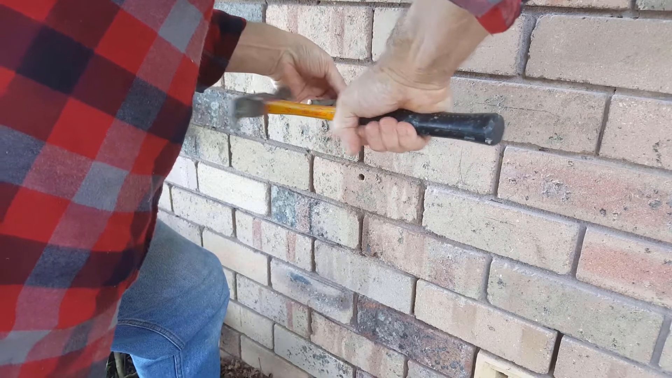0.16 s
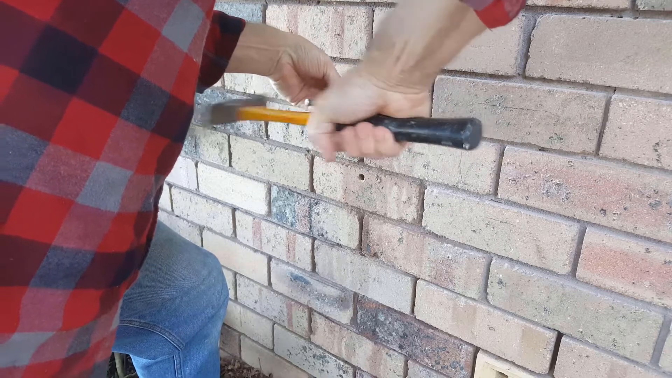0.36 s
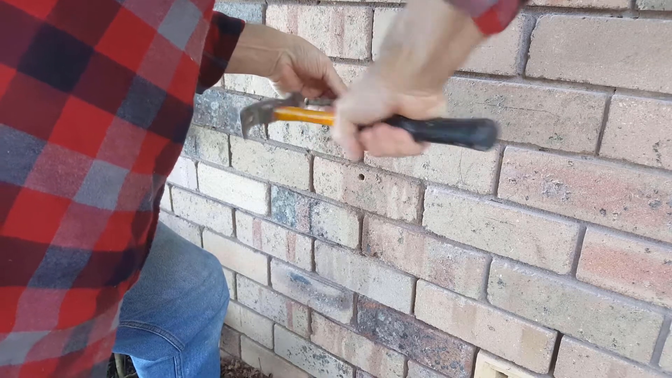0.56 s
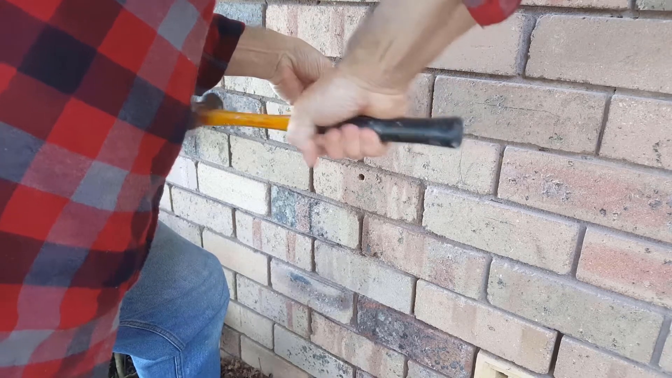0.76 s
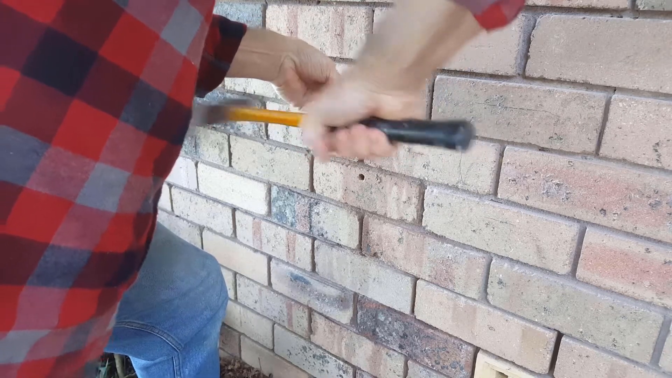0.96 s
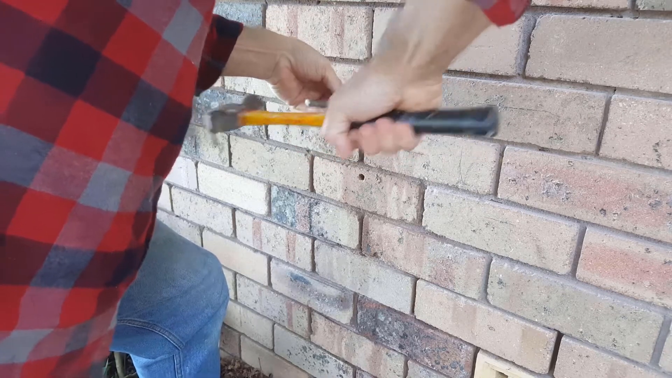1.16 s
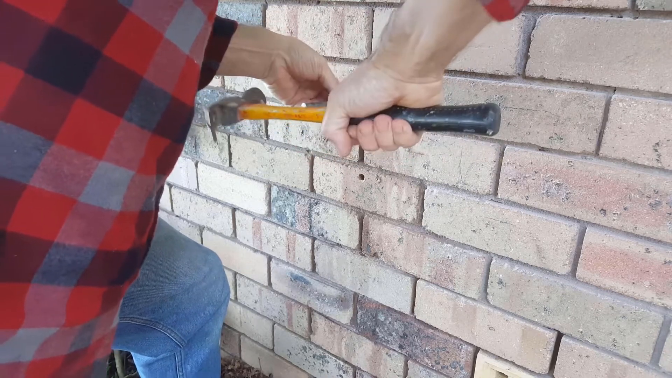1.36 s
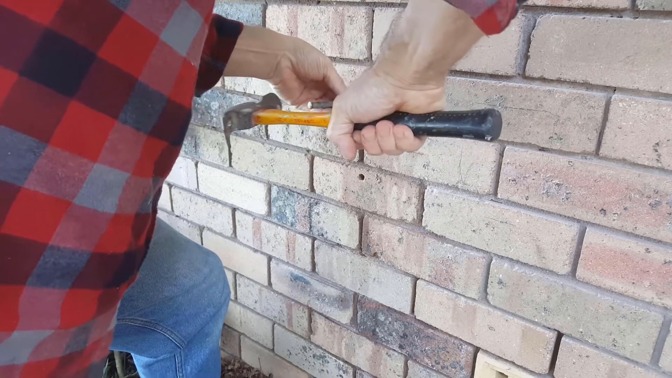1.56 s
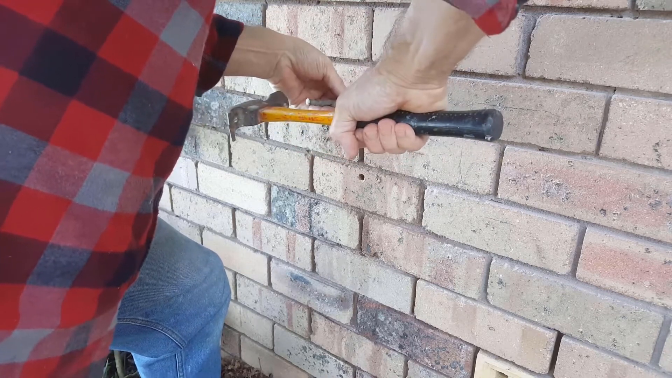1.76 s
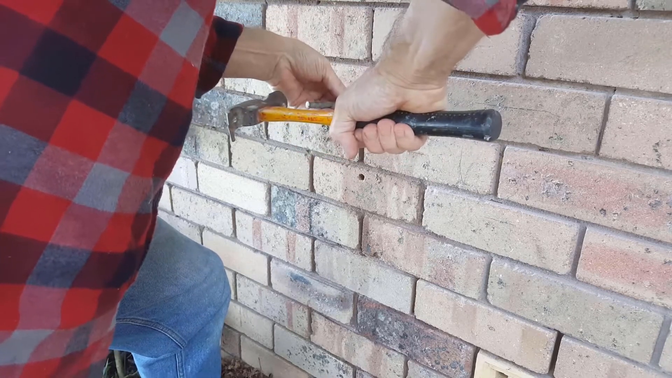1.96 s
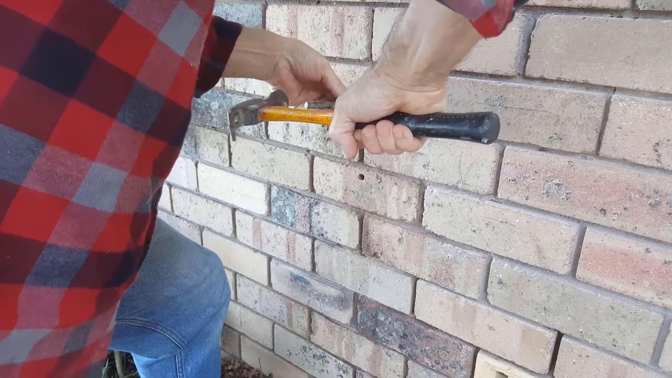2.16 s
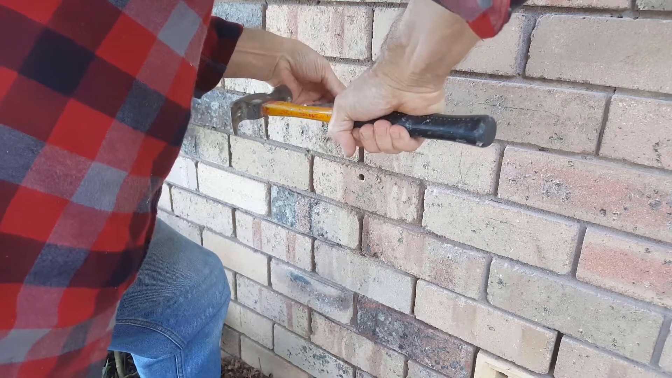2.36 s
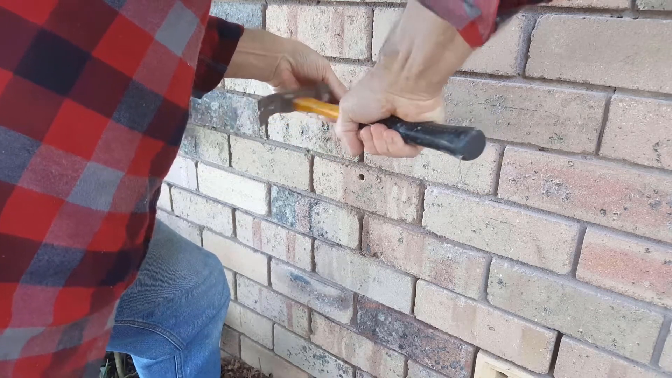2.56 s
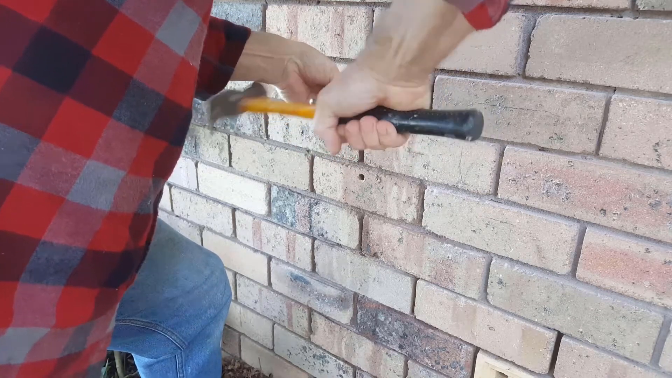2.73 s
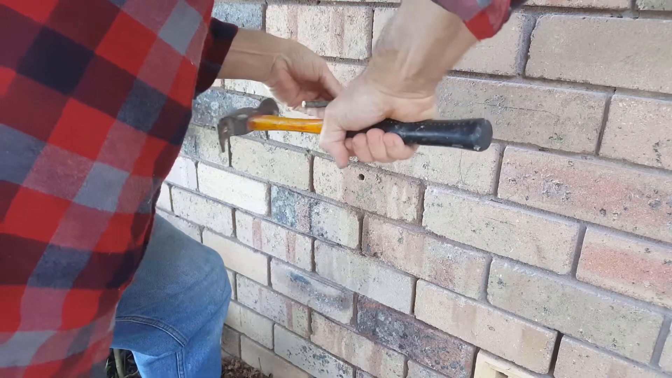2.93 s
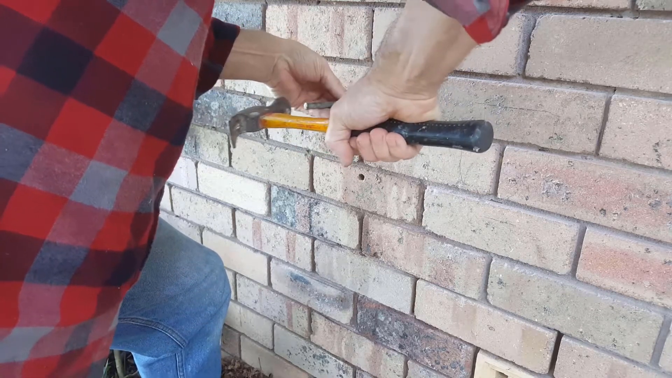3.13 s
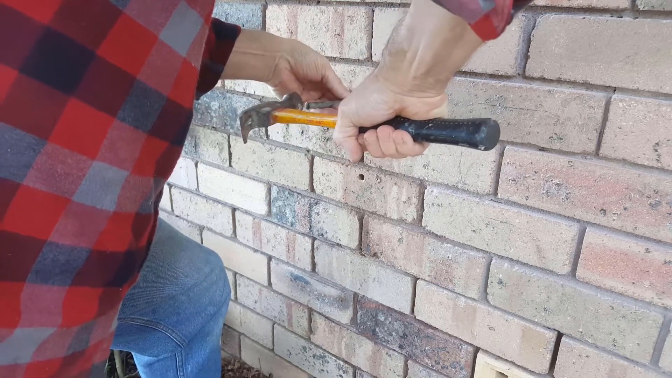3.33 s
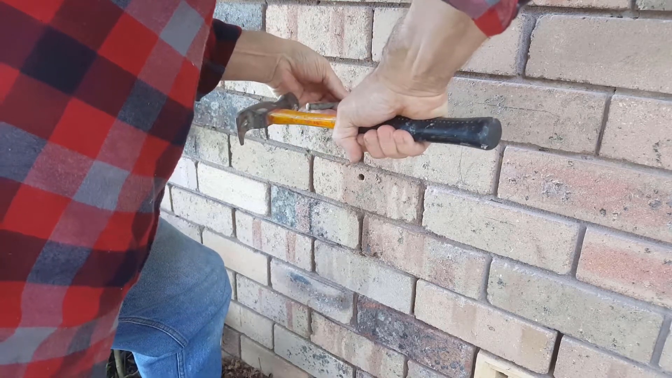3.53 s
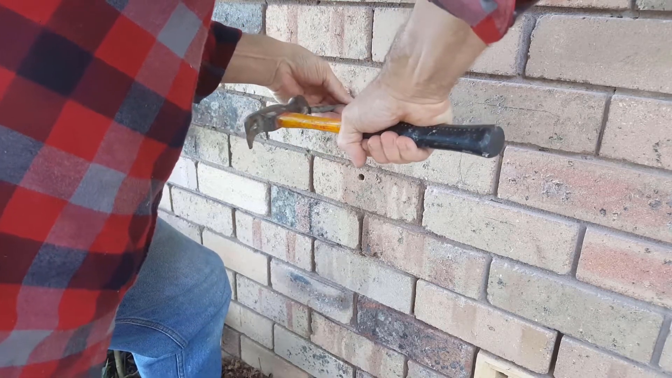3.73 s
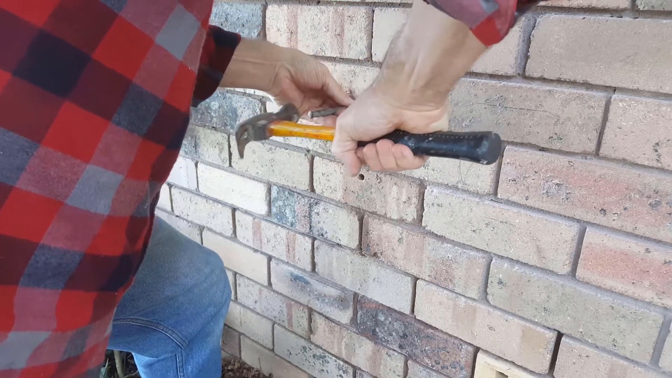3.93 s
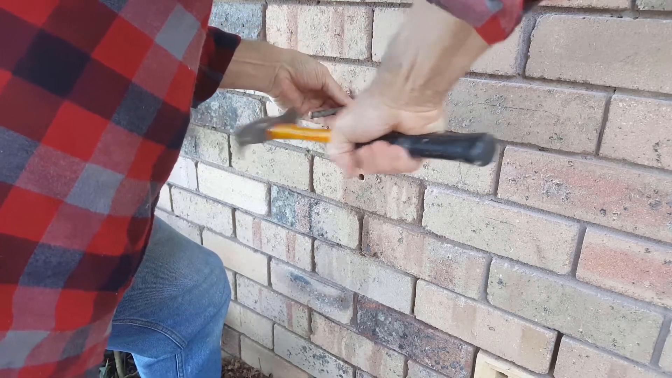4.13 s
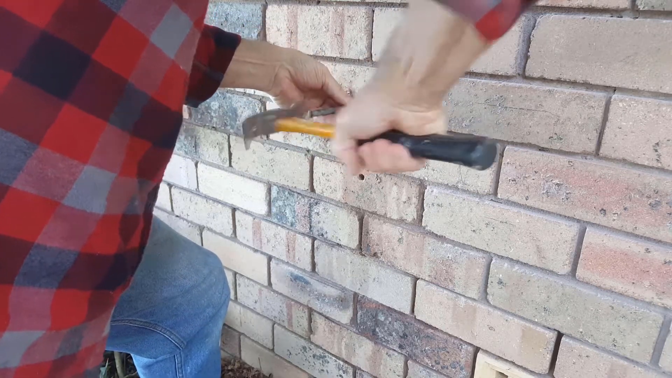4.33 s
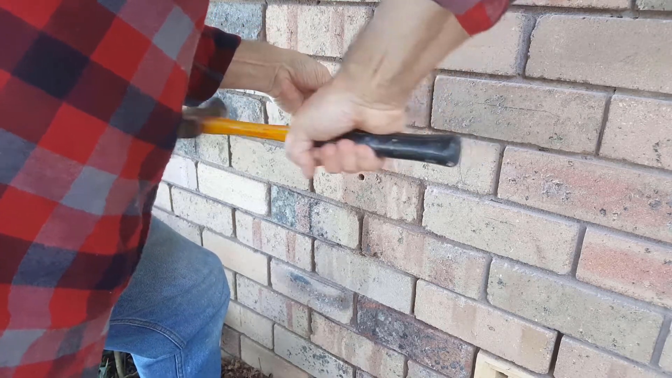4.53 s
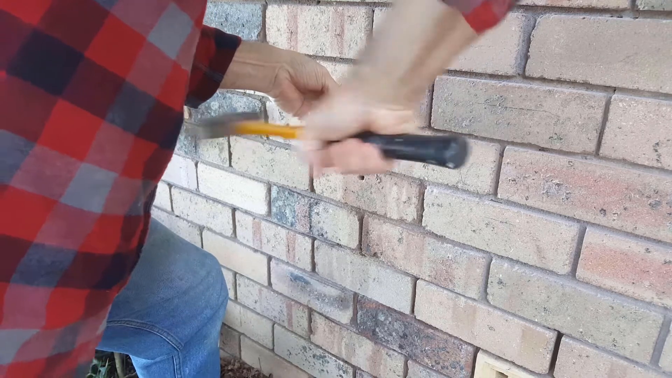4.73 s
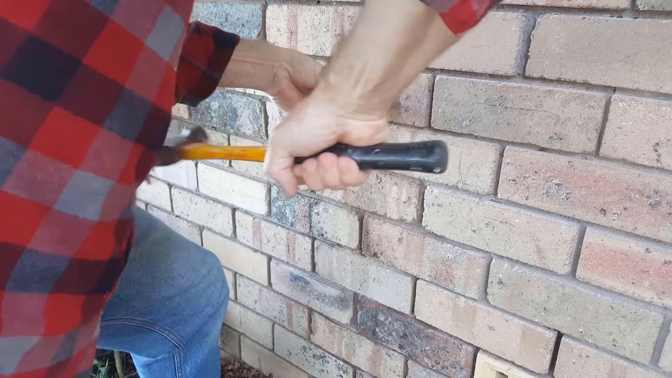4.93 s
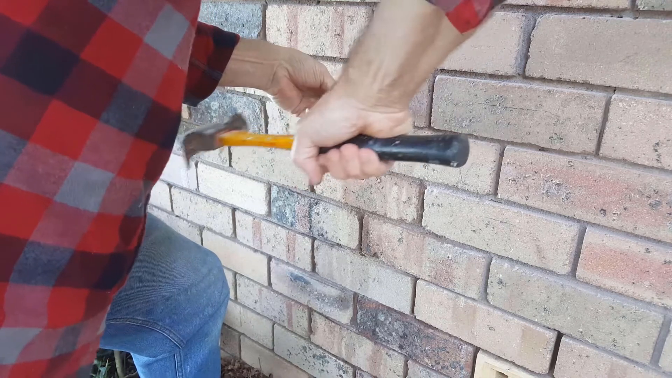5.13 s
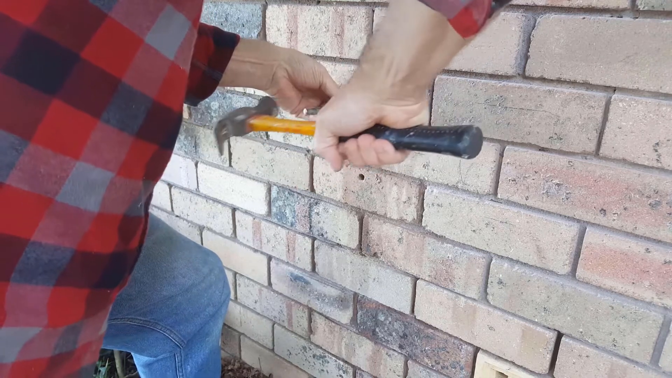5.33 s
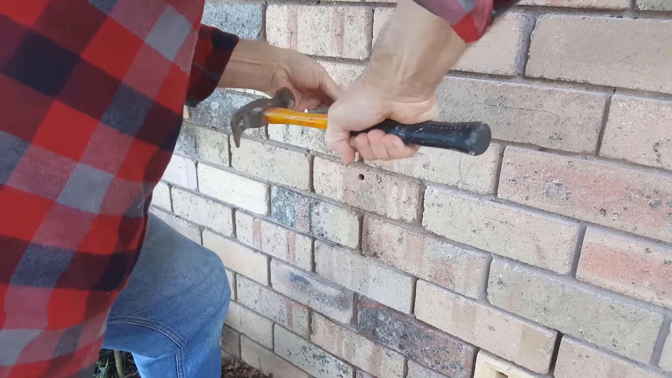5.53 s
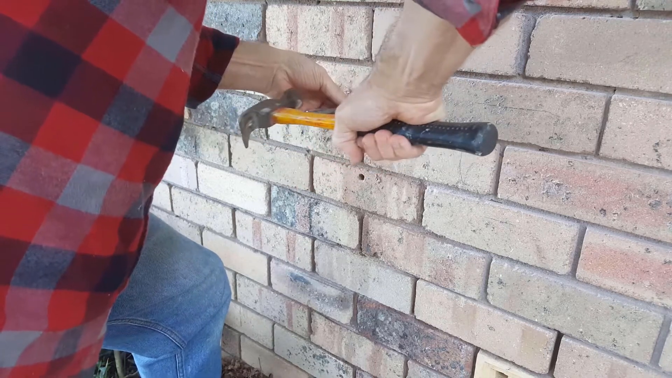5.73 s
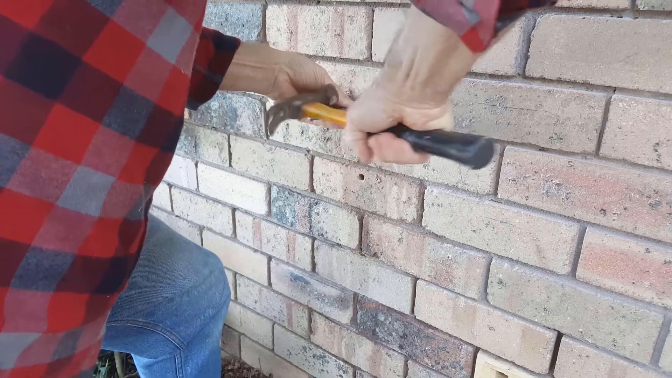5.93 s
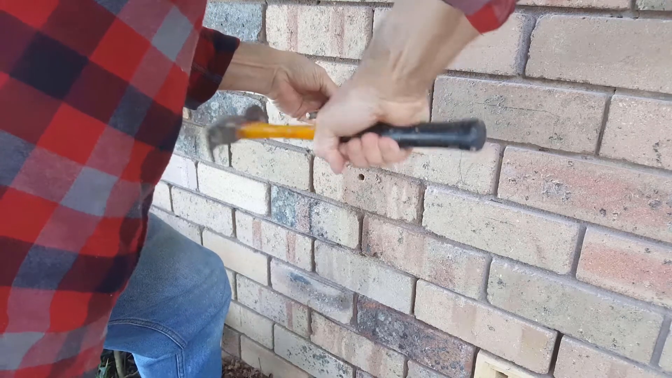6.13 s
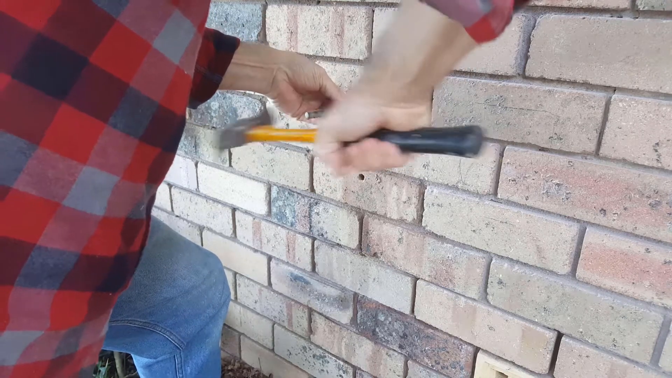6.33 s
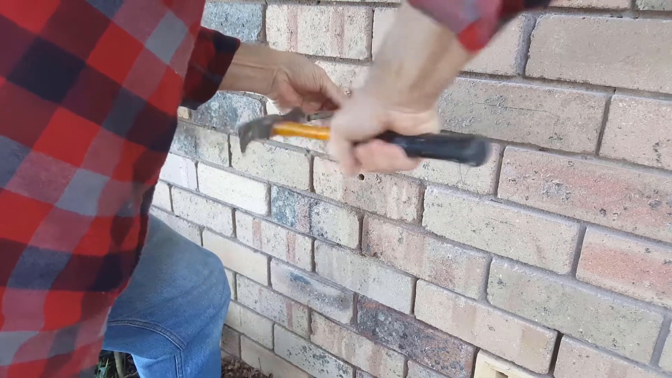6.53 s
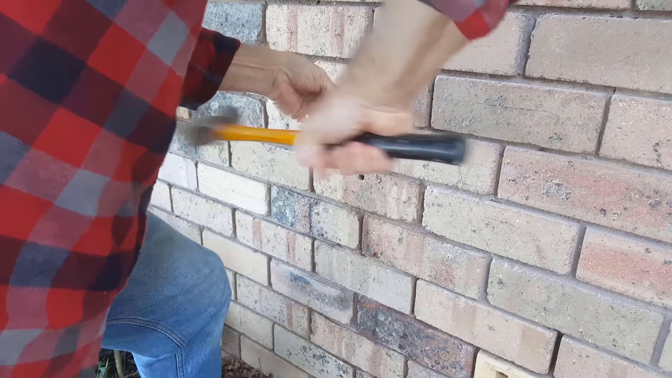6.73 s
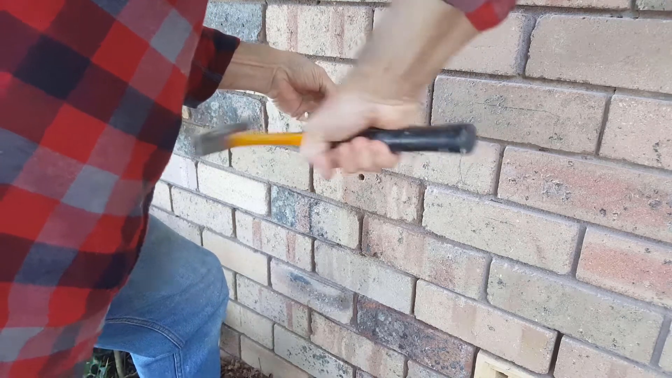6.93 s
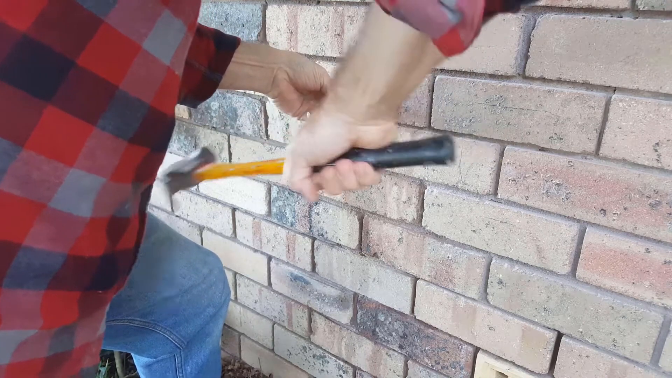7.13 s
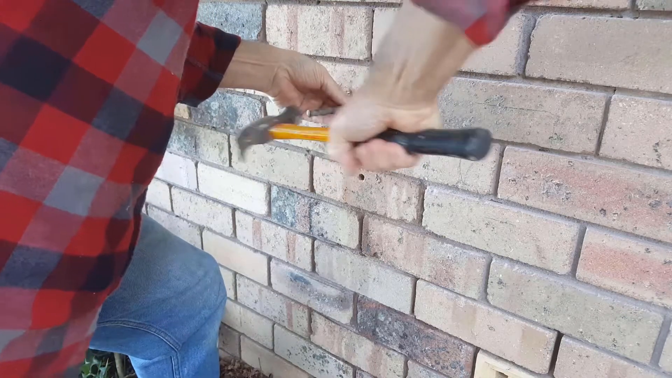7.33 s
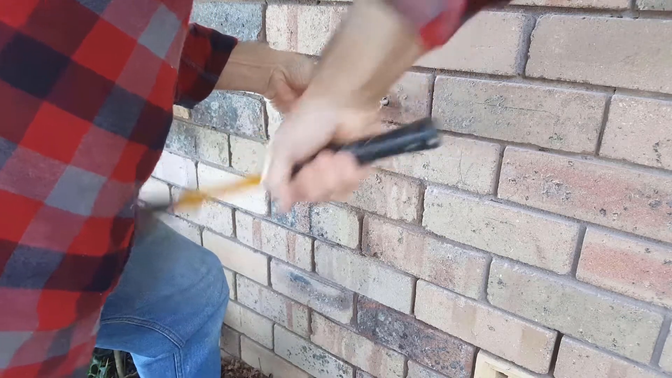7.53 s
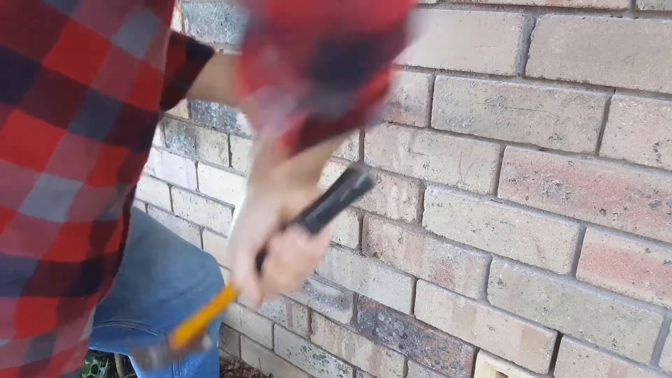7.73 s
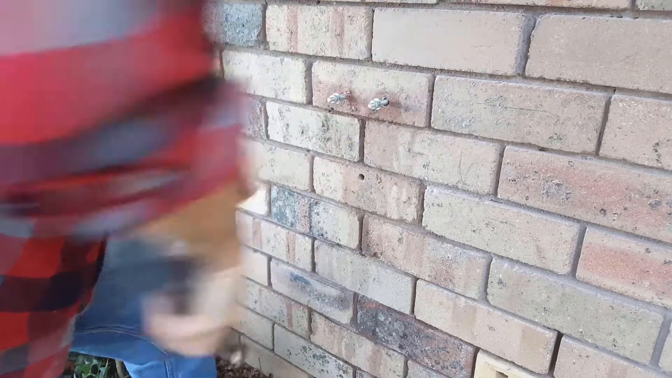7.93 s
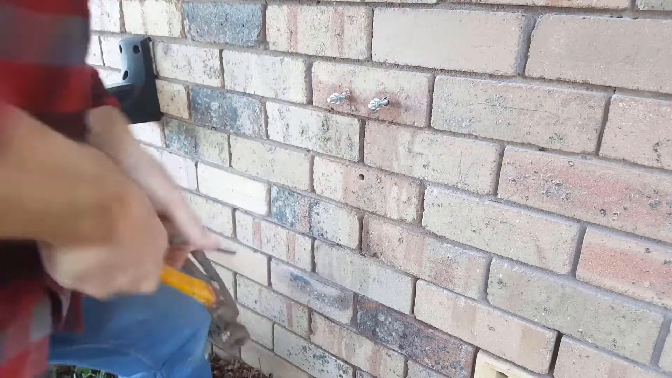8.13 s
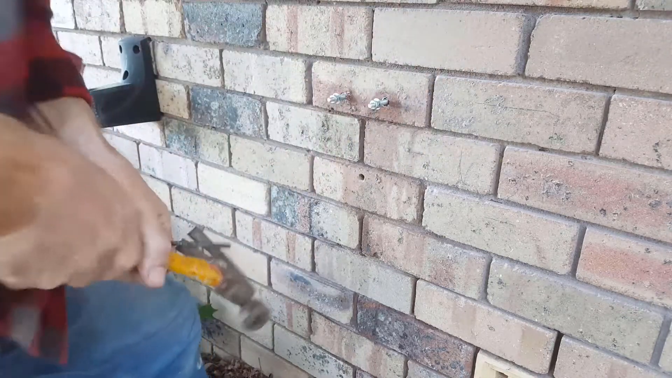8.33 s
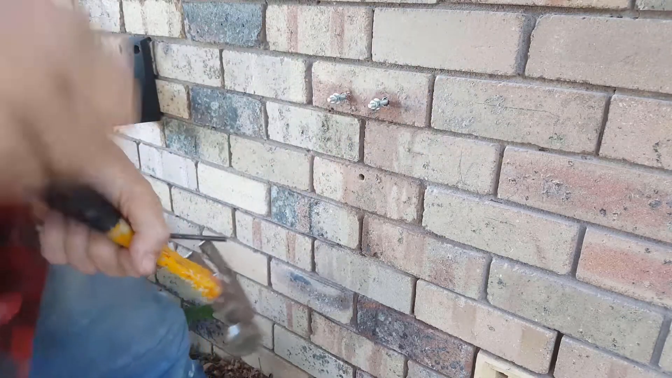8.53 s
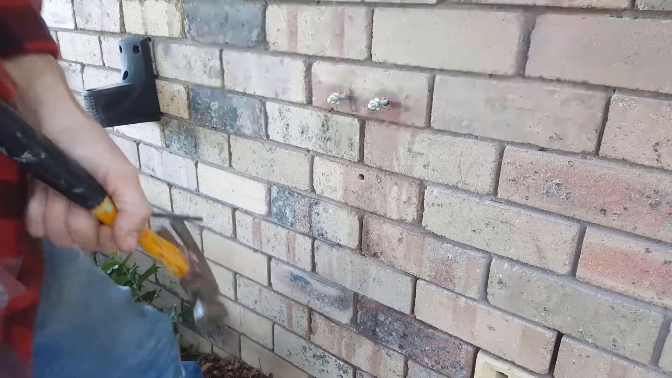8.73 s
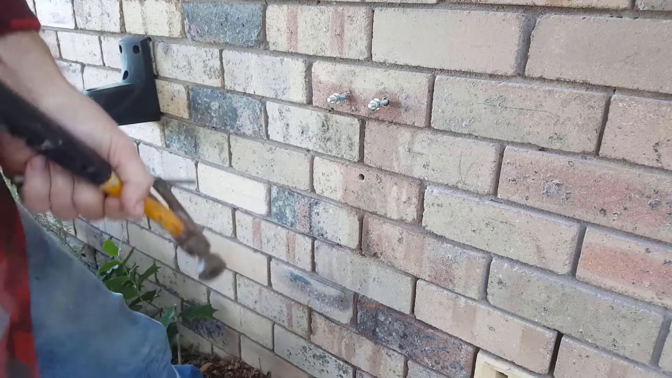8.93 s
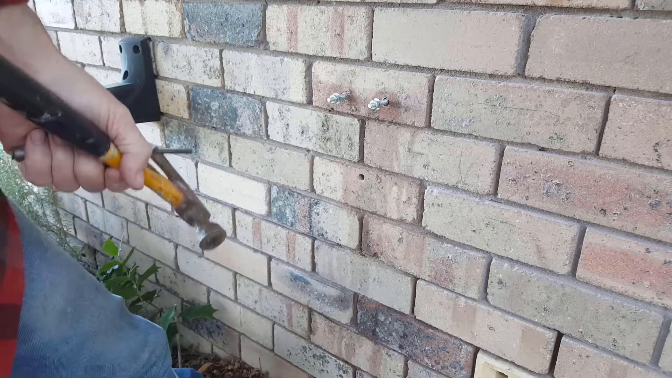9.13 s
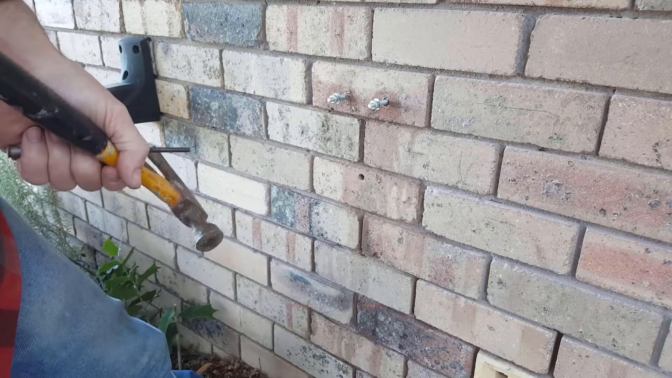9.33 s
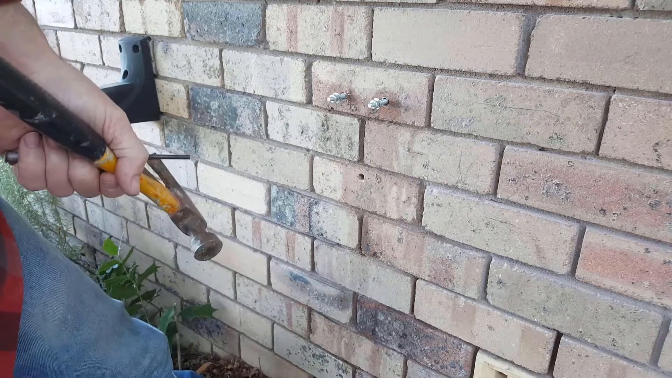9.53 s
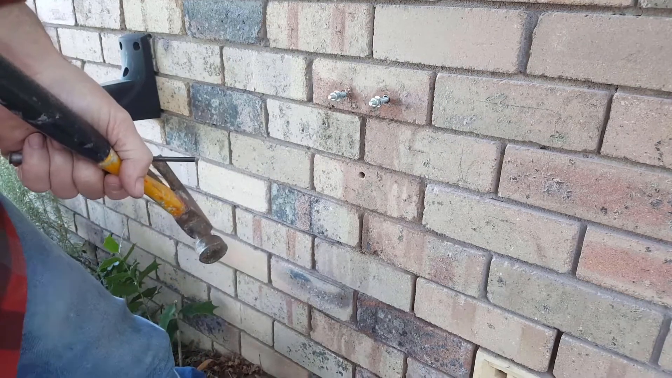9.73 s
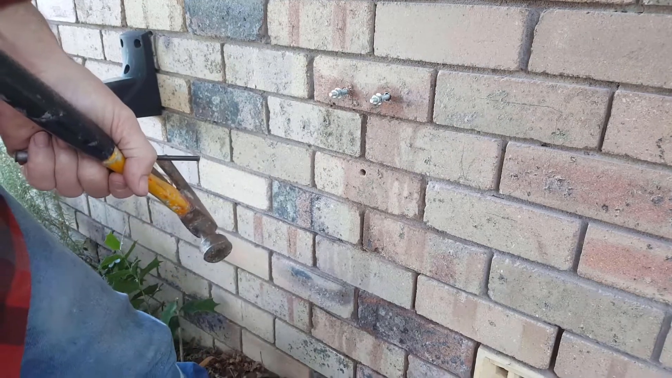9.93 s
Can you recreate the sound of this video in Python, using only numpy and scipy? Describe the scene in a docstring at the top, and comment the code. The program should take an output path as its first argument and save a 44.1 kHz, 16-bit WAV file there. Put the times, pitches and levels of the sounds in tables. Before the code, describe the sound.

Sharp ringing hammer blows drive a steel punch into brick outdoors, coming in groups with light taps between them.

```python
"""Over a distant street hum, a hammer drives a hand-held steel punch into a brick wall in groups of blows.
Each contact cracks, rings the steel and booms in the hollow wall; a yard answers. Between the groups
the punch touches lightly and grit rubs. Two unlike microphone ports listen; the left one is flicked
a few times near the end. The background sinks briefly after some hard blows and the first flick."""
import sys
import numpy as np
from scipy import signal
from scipy.fft import rfft, irfft, next_fast_len
from scipy.io import wavfile
from scipy.ndimage import uniform_filter1d, map_coordinates

SR = 44100
rng = np.random.default_rng(int(sys.argv[2]) if len(sys.argv) > 2 else 0)


def dump(signal):
    """Clip the signal to [-1, 1] and save it as 16-bit WAV at the path in sys.argv[1]."""
    limited = np.clip(np.atleast_2d(signal).T, -1, 1)
    pcm = np.round(limited * 32767).astype(np.int16)
    wavfile.write(sys.argv[1], SR, pcm)


N = 439677


def amp(db):
    """dB to gain."""
    return 10 ** (np.asarray(db) / 20)


def unit(x):
    """Scale to rms 1."""
    return x / np.sqrt(np.mean(x ** 2) + 1e-20)


def along(points, hz):
    """Interpolate (Hz, value) points on a log axis."""
    f, v = np.transpose(points)
    return np.interp(np.log(hz + 1), np.log(f + 1), v)


def add(out, sound, start_s):
    """Mix a sound into out."""
    part = out[..., round(start_s * SR):][..., :sound.shape[-1]]
    part += sound[..., :part.shape[-1]]


def colour(x, points):
    """Minimum-phase filter through (Hz, dB) points: no sound before its cause."""
    size = 2048
    cepstrum = irfft(np.log(amp(along(points, np.fft.rfftfreq(size, 1 / SR)))), size)
    cepstrum[1:size // 2] *= 2
    cepstrum[size // 2 + 1:] = 0
    return signal.fftconvolve(x, irfft(np.exp(rfft(cepstrum)), size))[:len(x)]


def ringing(modes, t, scatter_db, rise_s, waver_rad):
    """Dying (Hz, dB, t60) modes; each is a cluster of close modes, so its phase drifts."""
    hz, db, t60_s = np.transpose(modes)[:, :, None]
    db = db + scatter_db * rng.standard_normal(hz.shape)
    walk = waver_rad * np.cumsum(rng.standard_normal((len(hz), SR // 128 + 1)), axis=1)
    drift = uniform_filter1d(walk.repeat(64, axis=1)[:, :len(t)], size=128, axis=1)
    partials = amp(db - 60 * t / t60_s) * np.sin(2 * np.pi * hz * t + drift)
    return partials.sum(axis=0) * (1 - np.exp(-t / rise_s))


# diffuse field: (frequency [Hz], left-right coherence [0-1])
COHERENCE = [(60, 0.94), (150, 1), (300, 0.78), (640, 0.54), (1400, 0.045), (16000, .01)]

def diffuse(size, gain):
    """Stereo noise, alike in the bass, times gain(Hz, s)."""
    hz, t, spectra = signal.stft(rng.standard_normal((2, size)), SR, nperseg=512)
    angle = np.arccos(np.clip(along(COHERENCE, hz), 0, 1))[:, None] / 2
    mid, side = spectra[0] * np.cos(angle), spectra[1] * np.sin(angle)
    stereo = np.array([mid + side, mid - side]) * gain(hz[:, None], t)
    return signal.istft(stereo, SR, nperseg=512)[1][:, :size]


# background drift: (time [s], level [dB])
DRIFT = [(0, -66), (2.2, -65.5), (3.0, -64), (4.3, -64), (6.2, -64), (8.6, -62.5), (9.97, -60.5)]
# background dips: (time [s], depth [dB], extra depth at first [dB])
DIPS = [(0.92, 6, 1.5), (4.684, 7.5, -2.5), (6.6, 3, 0.5), (6.96, 2, 6.5), (7.344, 6.5, -4.5),
        (8.79, 10.5, 7)]

def background_gain(dip_share=1):
    """The background drifts slowly up and dips at the listed times."""
    now = np.arange(N) / SR
    dip_s = np.cumsum([0, 0.17, 0.4, 0.45])  # fall, hold, return
    plunge_s = np.cumsum([0, 0.012, 0.1, 0.06])
    db = np.interp(now, *np.transpose(DRIFT))
    for start_s, depth_db, extra_db in DIPS:
        db -= dip_share * np.interp(now - start_s, dip_s, [0, depth_db, depth_db, 0])
        db -= dip_share * np.interp(now - start_s, plunge_s, [0, extra_db, extra_db, 0])
    return amp(db)


# traffic hiss: (frequency [Hz], relative density [dB])
TRAFFIC_HISS = [(100, -36.5), (250, -14), (600, -14), (1200, -22), (3000, -22), (6000, -26), (10000, -36),
                (16000, -38)]
# traffic rumble: (frequency [Hz], relative density [dB])
TRAFFIC_RUMBLE = [(30, -25), (55, -8.5), (110, 4.5), (200, -13.5), (400, -21), (1000, -52.5)]

def street():
    """Distant traffic: a wide hiss and a low rumble."""
    hiss = unit(diffuse(N, lambda hz, t: amp(along(TRAFFIC_HISS, hz))))
    rumble = unit(diffuse(N, lambda hz, t: amp(along(TRAFFIC_RUMBLE, hz))))
    return amp(-2) * background_gain() * hiss + amp(0.5) * background_gain(dip_share=0.92) * rumble


def brightness_db(hz, treble_db):
    """Shelf over 5-10 kHz: harder contacts are brighter."""
    return (treble_db + 27.5) * np.clip(np.log2(hz / 5000), 0, 1)


# crack spectrum: (frequency [Hz], level [dB])
CRACK_SPECTRUM = [(60, -10.5), (200, -8), (500, 0.5), (1000, 1), (1450, -0.5), (2000, -5), (2700, -10.5),
                  (3400, -12), (4400, 1.5), (5500, 0.5), (7000, -2), (9000, -8.5), (16000, -15)]

def brick_crack(t, grit_t60_s, treble_db, clack_db, knock_db):
    """A spike, then crushed grit. Returns the near stereo crack and the even pulse it is from afar."""
    spike_db, spike_t60_s, rise_s = 12, 0.0087, 0.00025
    fade = amp(spike_db - 60 * t / spike_t60_s) + amp(-60 * t / grit_t60_s)
    grit = rng.standard_normal((3, len(t))) * fade * (1 - np.exp(-t / rise_s))
    grit[:, 4] += 5  # steel meets steel
    spectrum = [
        (hz, db + brightness_db(hz, treble_db) + clack_db * (1500 < hz < 3600) + knock_db * (hz < 1500))
        for hz, db in CRACK_SPECTRUM]
    # each port gets its own near reflections
    near = np.array([colour(grit[0] + 2.1 * grit[k], spectrum) for k in (1, 2)])
    filter_rms = np.linalg.norm(amp(along(spectrum, np.linspace(0, SR / 2, num=400)))) / 20
    near *= filter_rms * np.linalg.norm(fade) / np.linalg.norm(near)  # steady energy per strength
    far = colour(1. * (t == 0), spectrum)
    far *= np.linalg.norm(near[0]) / np.linalg.norm(far)
    return near, far


# hammer head modes: (frequency [Hz], level [dB], t60 [s])
HEAD_MODES = [(4300, 0, .022), (4500, 0, .022), (4720, 0, .022), (5000, -4, .02), (6160, -8, .06),
              (7000, -10, .04), (7800, -10, .05), (8100, -10, .05), (12660, -16, .06)]
# punch modes: (frequency [Hz], level [dB], t60 [s])
PUNCH_MODES = [(4075, 0, .045), (6600, 3, .06), (11800, -11, .06), (13250, -18, .07), (14950, -13, .07)]

def steel_ring(t, treble_db, head_db, ping_db, jingle_db):
    """Hammer head and punch ring; the grip damps the punch's overtones (jingle) more or less."""
    head = [(hz, db + head_db + brightness_db(hz, treble_db), t60_s) for hz, db, t60_s in HEAD_MODES]
    punch = [(hz, db + (ping_db + 14.5 if hz < 5000 else jingle_db + 8), t60_s)
             for hz, db, t60_s in PUNCH_MODES]
    return ringing(head + punch, t, scatter_db=1.5, rise_s=0.0004, waver_rad=0.32)


# hollow brickwork modes: (frequency [Hz], level [dB], t60 [s])
WALL_MODES = [(105, 1, 0.1), (152.7, -12, .5), (189, -2, 0.14), (216.2, -8, 0.28), (282, -3.5, 0.13),
              (316.8, -2.5, 0.19), (416.7, -1, 0.2), (461, -13, .6), (517, -21, 0.89), (537, -1.5, 0.13),
              (656, -22, 0.12), (668, -6, 0.15), (743, -11, 0.14), (810, 1.5, 0.046), (852.7, -2.5, 0.067),
              (899, -23, 0.31), (996.5, 1, 0.05), (1096, -13, 0.098), (1180, -13.5, 0.12),
              (1240, -30.5, 0.56), (1285, -22, 0.22)]

def wall_boom(level_db, boom_db):
    """The hollow wall booms; level_db sets only the length, as faint booms are cut shorter."""
    t = np.arange(SR * 2 // 5 if level_db + boom_db > -40 else SR // 10) / SR
    return amp(boom_db - 3) * ringing(WALL_MODES, t, scatter_db=2, rise_s=0.003, waver_rad=0.3)


# yard reverberation: (frequency [Hz], t60 [s])
YARD_DECAY = [(60, 0.99), (200, 0.93), (500, 0.73), (900, 0.32), (1500, 0.21), (3000, 0.15), (8000, 0.24),
              (16000, 0.17)]

def yard(x, wet_db):
    """Nearby walls return the sound, each frequency dying at its own rate."""
    tail = diffuse(SR // 3, lambda hz, t: amp(-60 * t / along(YARD_DECAY, hz)))
    tail /= np.linalg.norm(tail[0])
    return amp(wet_db) * signal.fftconvolve(x[None], tail, axes=1)[:, :SR // 2]


def contact(level_db, clack_db, knock_db, boom_db, ping_db, jingle_db, head_db, treble_db, grit_t60_s):
    """One contact: crack, ringing steel, wall boom and the yard's answer."""
    t = np.arange(SR // 10) / SR
    crack, far_crack = brick_crack(t, grit_t60_s, treble_db, clack_db, knock_db)
    steel = steel_ring(t, treble_db, head_db, ping_db, jingle_db)
    boom = wall_boom(level_db, boom_db)
    radiated = amp(-11.5) * (far_crack + 0.51 * steel) + amp(-6) * boom[:len(t)]
    sound = np.zeros((2, SR))
    add(sound, amp(-13) * (crack + steel), 0)
    add(sound, boom, 0)
    add(sound, yard(radiated, wet_db=-13.5), start_s=0.004)
    return amp(level_db) * sound


# blows and rebounds: (time [s], level [dB], bite [0-1], head ring [dB], punch ping [dB], treble [dB])
HAMMER_BLOWS = [(0.2781, -7.5, 0.78, -9, -19.5, -27.5), (0.3367, -15.5, 0.54, -11.5, -21, -51),
                (0.63, -0.5, 0.37, -14, -23.5, -27.5), (0.9202, -2.5, 0.41, 0, -18, -24),
                (3.7976, -17, 0.48, -17.5, -16.5, -52), (4.1249, -4, 0.33, -3.5, -27, -39.5),
                (4.4054, -3.5, 0.81, -12.5, -28, -21), (4.684, -4, 0.75, -8.5, -17.5, -22.5),
                (4.7246, -11.5, 0.28, -4, -15.5, -43.5), (6.295, -6, 1, -35, -24, -22.5),
                (6.5911, -4, 0.79, -21, -36.5, -21.5), (6.8565, 1.5, 0, -20, -32, -28.5),
                (6.8918, -12, 0.3, -4, -24, -35.5), (7.3443, -6, 0.74, -12, -24, -21.5)]

def blows():
    """Hammer blows, coloured by depth: bite 0 glances off, bite 1 digs fully into the brick."""
    out = np.zeros((2, N))
    for start_s, level_db, bite, head_db, ping_db, treble_db in HAMMER_BLOWS:
        by_bite = lambda glancing, full: glancing + bite * (full - glancing)
        blow = contact(level_db, clack_db=by_bite(-3, 5), knock_db=by_bite(-7, 11.5),
                       boom_db=by_bite(-23, -13), ping_db=ping_db, jingle_db=-25, head_db=head_db,
                       treble_db=treble_db, grit_t60_s=by_bite(0.01, 0.07))
        add(out, blow, start_s)
    return out


# light touches: (time [s], level [dB], brick clack [dB], brick knock [dB], punch ping [dB], jingle [dB])
PUNCH_TOUCHES = [(1.469, -55, -4, -7, -15, -28), (1.644, -57, 19, 17, -31, -42),
                 (1.8888, -47, 14, 12.5, -30.5, -31), (2.605, -35, 19.5, 3.5, -1, -24),
                 (2.635, -16.5, 9.5, 3.5, -14, -29), (2.6533, -33.5, 22.5, 14.5, -33, -27),
                 (2.6968, -37.5, -1, 6, -3, -16), (2.7334, -32.5, 19.5, 14.5, -30, -19),
                 (2.7683, -43.5, -6, 16, -23, 3), (2.849, -31, 9, -8, -36, -22),
                 (2.8655, -41, 0, -3, -17, -20), (3.0514, -49.5, 11, 20, -19, -25),
                 (3.0638, -50.5, 10, 15.5, -10, 2), (3.169, -45.5, 15, 9, -9, -11),
                 (3.231, -37, 7, -16, -35, -30), (3.2919, -47.5, 27, 20.5, -28, -41),
                 (3.427, -51, 15, 0, -14, -33), (3.5004, -50, -6, -9, -6.5, 4.5),
                 (3.512, -48, 15.5, -13, -19, -26), (3.5654, -49.5, 16, 16, -12, -34),
                 (5.3042, -42, 4, -19, -27, -27), (5.911, -39.5, 18.5, 8, -30, -28),
                 (5.9319, -31.5, 11, 3.5, -12, -33), (5.9611, -24, 16.5, 4, -21, -12),
                 (7.6075, -59.5, 27.5, 0, -38, -42), (8.336, -26, 22, 2.5, -9, -5.5),
                 (8.356, -38, 22, 8.5, -0.5, -38)]

def touches():
    """Light touches, coloured by where the punch lands; a knock on the brick also booms in the wall."""
    out = np.zeros((2, N))
    for start_s, level_db, clack_db, knock_db, ping_db, jingle_db in PUNCH_TOUCHES:
        boom_db = -32.5 + 1.16 * knock_db
        touch = contact(level_db, clack_db, knock_db, boom_db, ping_db, jingle_db,
                        head_db=-25, treble_db=-31.5, grit_t60_s=0.053)
        add(out, touch, start_s)
    return out


# scrape strokes: (time [s], length [s], rub [dB], tinkle [dB])
STROKES = [(2.656, 0.032, -35.5, -50), (2.736, 0.0037, -31, -39), (2.852, 0.0071, -52, -46),
           (9.255, .03, -65.5, -87.5), (9.351, .03, -64.5, -90.5)]
# rubbing grit: (frequency [Hz], relative density [dB])
GRIT_SPECTRUM = [(300, -69), (800, 13), (1800, 7.5), (3000, -6), (5000, -10), (9000, -9), (16000, -4)]

def scraping():
    """Grit rubs in uneven grains while the tools shift, and sets the loose punch tinkling."""
    rise_db_per_s, fall_db_per_s = 900, 420
    now = np.arange(N) / SR
    ramps_db = [np.minimum(rise_db_per_s * (now - start_s), fall_db_per_s * (start_s + length_s - now))
                for start_s, length_s, *_ in STROKES]
    rub_gain, tinkle_gain = amp(np.transpose(STROKES)[2:]) @ amp(np.minimum(0, ramps_db))
    grains_db = 4.5 * map_coordinates(rng.standard_normal(N // 100 + 2), [np.arange(N) / 100])
    friction = amp(grains_db) * rng.standard_normal((2, N))
    rub = unit(np.array([colour(side, GRIT_SPECTRUM) for side in friction]))
    punch = ringing(PUNCH_MODES, now[:SR // 10], scatter_db=0, rise_s=0.0004, waver_rad=0.3)
    tinkle = unit(signal.fftconvolve(friction[0], punch)[:N])
    return amp(-10.5) * rub_gain * rub + amp(-4) * tinkle_gain * tinkle


# flicks on the left port: (time [s], level [dB], knock [dB], ring [dB])
PORT_FLICKS = [(8.785, 3, -33, -47), (8.7998, -22.5, -23, -31), (9.5212, -43, 5.5, -17.5),
               (9.5542, -35.5, -22, -27), (9.7896, -25.5, -22, -39), (9.8175, -6.5, -5.5, -16),
               (9.8382, -22.5, 2, -18)]
# flick clack: (frequency [Hz], level [dB])
CLACK_SPECTRUM = [(100, -39.5), (420, -21), (600, -0.5), (1000, -4), (1600, 0.5), (2700, -7.5),
                  (4500, -9.5), (8000, -13), (16000, -20.5)]

def flicks():
    """A snap at the left port: broad clack, thud, knock, short plastic ring; faint on the right."""
    snap_t60_s, rattle_t60_s = 0.0075, 0.058
    out, t = np.zeros(N), np.arange(SR // 10) / SR
    for start_s, level_db, knock_db, ring_db in PORT_FLICKS:
        rattle_db, thud_db = -5 + 0.6 * ring_db, knock_db - 13.5
        fade = amp(-60 * t / snap_t60_s) + amp(rattle_db - 60 * t / rattle_t60_s)
        burst = rng.standard_normal(len(t)) * fade
        burst[0] += 5  # the snap itself
        modes = [(130, thud_db, 0.05), (300, thud_db, 0.04),
                 (600, knock_db - 7.5, 0.025), (2138, ring_db - 6.5, 0.06)]
        shell = ringing(modes, t, scatter_db=4.5, rise_s=0.00075, waver_rad=0.72)
        add(out, amp(level_db) * (colour(burst, CLACK_SPECTRUM) + shell), start_s)
    return out * amp([[0], [-32]])


def scene():
    """All sources at the two ports; blows and touches reach the left one later."""
    left_lag_samples = 8
    hammering = blows() + touches()
    hammering[0] = np.roll(hammering[0], left_lag_samples)
    return hammering + scraping() + flicks() + street()


# left port response: (frequency [Hz], gain [dB])
LEFT_PORT = [(200, 2), (700, 4), (1300, 3.5), (2000, 12), (2650, 19), (3600, 11), (5500, 1.5), (7000, -2.5),
             (9500, -27), (16000, -9.5)]
# right port response: (frequency [Hz], gain [dB])
RIGHT_PORT = [(200, 1), (3000, -0.5), (6000, 2.5), (8100, 5), (9500, -5), (16000, -2.5)]

def record(dry):
    """Port colours, amplifier hiss that follows the background, soft clipping, bass cut, band limit."""
    ceiling, bass_cut_hz, top_hz, taper_hz = 0.9, 40, 15950, 300
    x = np.array([colour(dry[0], LEFT_PORT), colour(dry[1], RIGHT_PORT)])
    x += amp(-12.5) * background_gain() * rng.standard_normal((2, N))
    x = x / (1 + np.abs(x / ceiling) ** 8) ** (1 / 8)
    x = signal.sosfilt(signal.butter(2, bass_cut_hz, "high", fs=SR, output="sos"), x)
    size = next_fast_len(N + 8192)
    passband = np.clip((top_hz - np.fft.rfftfreq(size, 1 / SR)) / taper_hz, 0, 1)
    return irfft(rfft(x, size) * passband, size)[:, :N]


dry = scene()
out = record(dry)
dump(out)
```